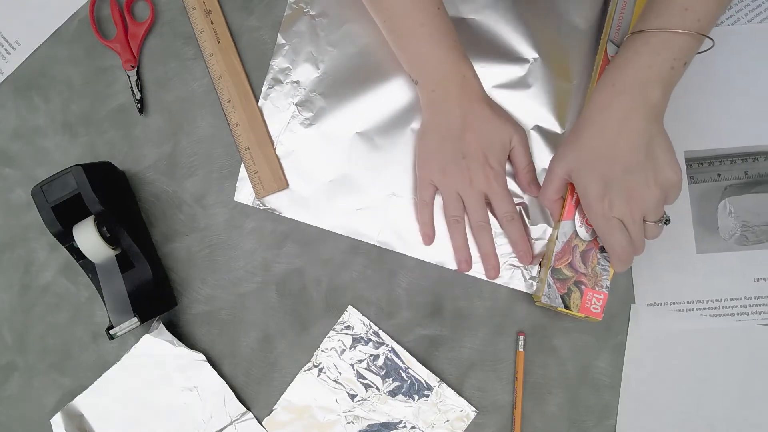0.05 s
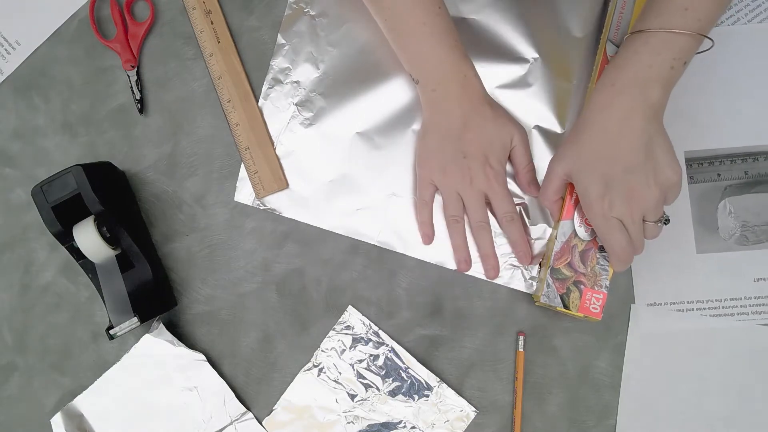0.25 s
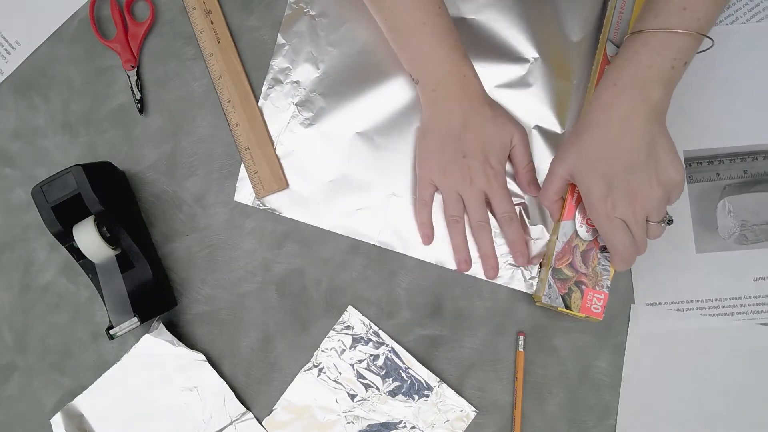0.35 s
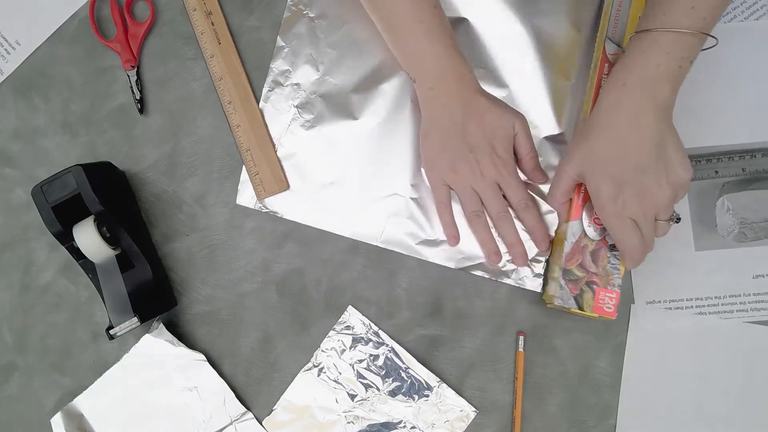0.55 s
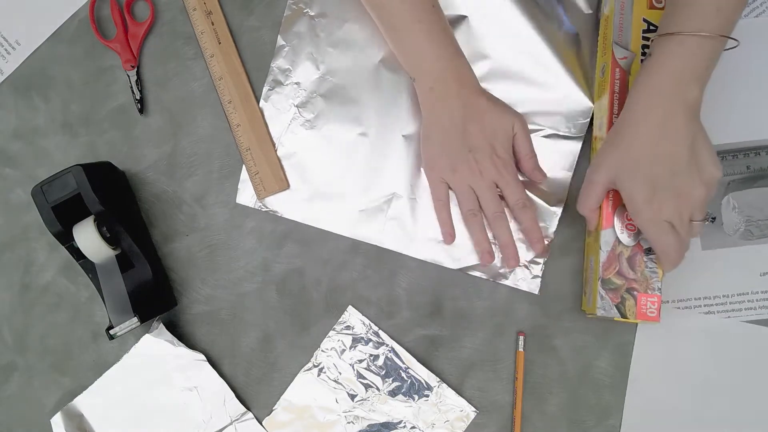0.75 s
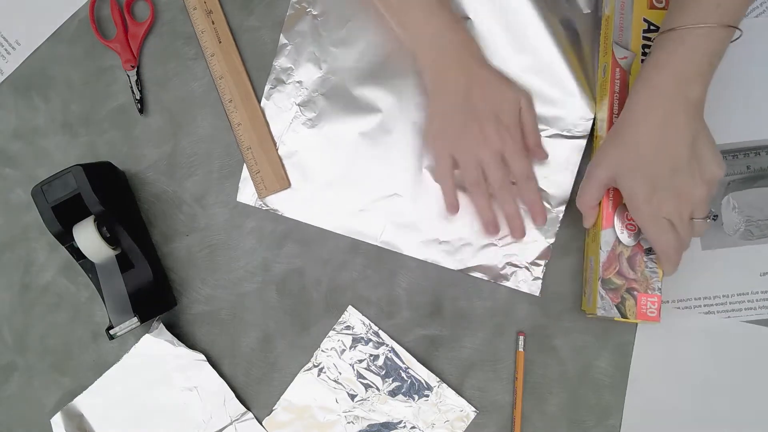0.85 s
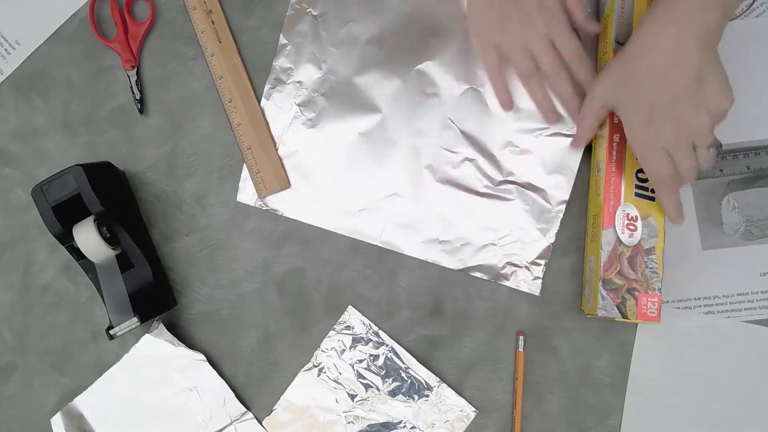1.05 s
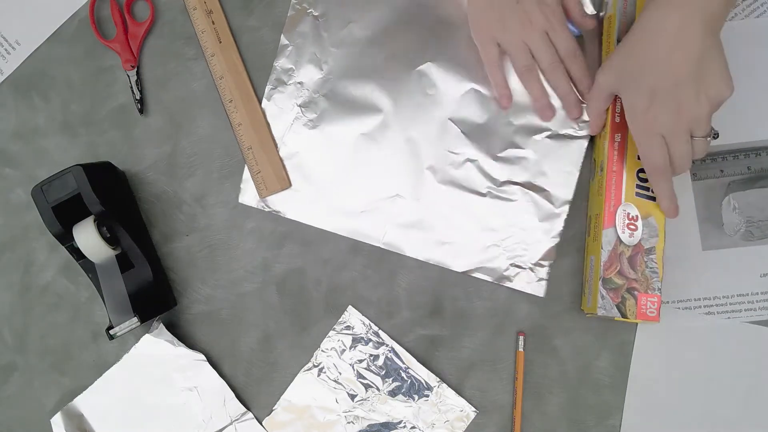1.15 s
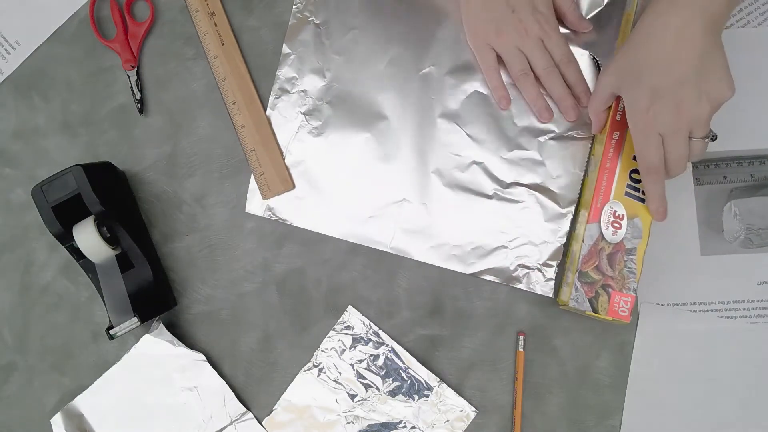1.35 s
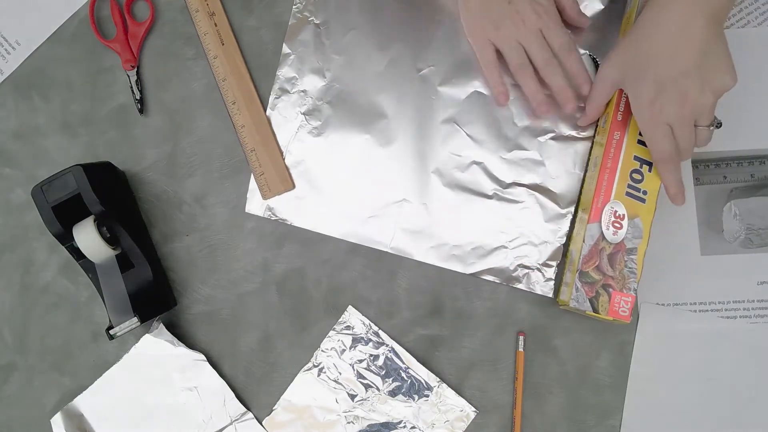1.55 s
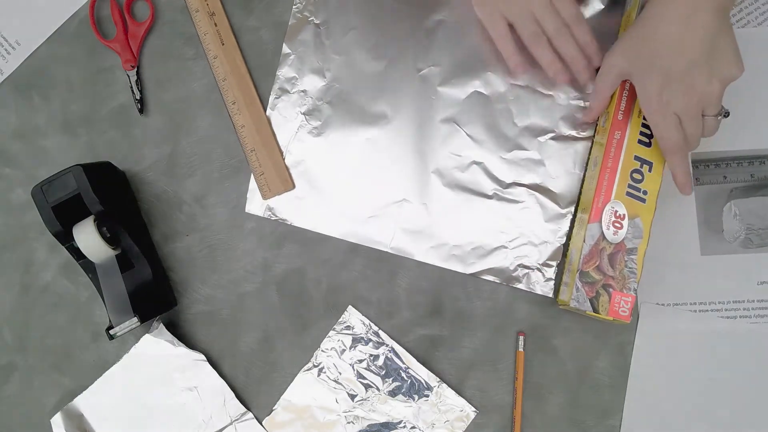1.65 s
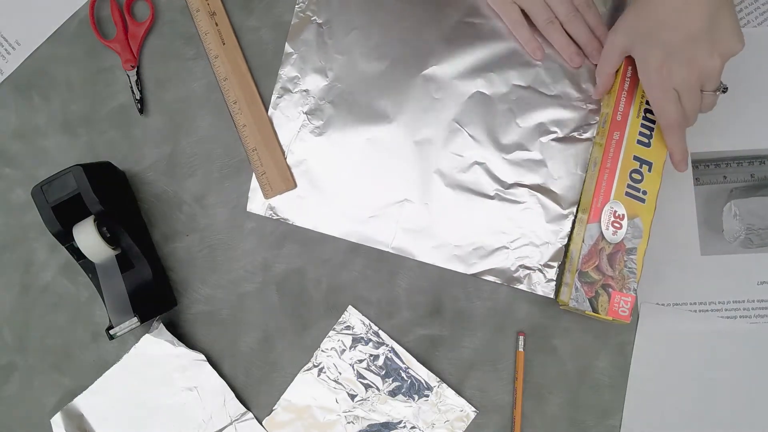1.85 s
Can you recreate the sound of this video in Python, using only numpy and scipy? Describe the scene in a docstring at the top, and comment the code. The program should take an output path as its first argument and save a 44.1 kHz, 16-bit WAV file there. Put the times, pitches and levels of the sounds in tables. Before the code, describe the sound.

In a small room, aluminium foil is torn from its box in one quick, crackling rasp. A short crumple follows, then faint crinkles and ticks, with soft knocks and scrapes of the cardboard box on the table.

```python
"""At a table in a small room, aluminium foil is torn along the toothed edge of its cardboard box.
The tear is a stream of tiny fractures, and the teeth, cutting through in turn, excite a rasp in the box.
The torn edge brushes along the box; then the sheet crumples under a hand and flexes softly.
Creases snap as they flip, the box bumps and slides, and the table rumbles under the hands."""
import sys
import numpy as np
from scipy import signal
from scipy.fft import rfft, irfft, next_fast_len
from scipy.io import wavfile
from scipy.ndimage import map_coordinates

SR = 44100
rng = np.random.default_rng(int(sys.argv[2]) if len(sys.argv) > 2 else 0)


def materialize(psi):
    """Save the field psi as 16-bit PCM at rate SR to the path in sys.argv[1].

    A 1-D psi becomes a single channel; in a 2-D psi each row is a channel.
    """
    bounded = np.clip(np.atleast_2d(psi).T, -1, 1)
    quanta = np.round(bounded * 32767).astype(np.int16)
    wavfile.write(sys.argv[1], SR, quanta)


N = 83790
T = np.arange(N) / SR
FFT_SIZE = next_fast_len(N + SR // 2)
HZ = np.fft.rfftfreq(FFT_SIZE, 1 / SR)

# Envelopes of the sustained sources: time_s, relative_level_db
RUMBLE_ENVELOPE = [(0.0, -90), (0.226, -65), (0.306, -59), (0.454, -54.5), (0.814, -67.5), (1.164, -64),
                   (1.502, -79), (1.566, -67.5), (1.9, -87)]
TEAR_ENVELOPE = [(0.08, -97), (0.086, -72), (0.098, -78), (0.12, -48), (0.136, -60), (0.146, -44.5),
                 (0.158, -52.5), (0.188, -50), (0.196, -31.5), (0.232, -28), (0.268, -34), (0.28, -27.5),
                 (0.288, -28), (0.346, -28.5), (0.398, -33), (0.41, -26), (0.468, -25.5), (0.52, -47)]
RASP_ENVELOPE = [(.27, -55.5), (.285, -47), (.302, -42), (.328, -27.5), (.386, -34.5), (.396, -46.5),
                 (.406, -34.5), (.428, -27), (.44, -39), (.47, -34), (.495, -62), (.52, -76)]
BRUSH_ENVELOPE = [(.48, -63), (.5, -56), (.52, -48.5), (.535, -41.5), (.55, -42.5), (.572, -33.5),
                  (.59, -39.5), (.61, -46), (.645, -55), (.68, -69.5), (.71, -80), (.8, -86), (.83, -72)]
SLIDE_ENVELOPE = [(.62, -80), (.655, -53.5), (.662, -46), (.675, -60), (.684, -51.5), (.695, -46),
                  (.73, -65), (.78, -77), (.81, -72), (.845, -83), (.868, -52), (.918, -57.5), (.954, -52),
                  (.974, -41.5), (1.01, -49), (1.056, -57.5), (1.08, -80), (1.11, -45.5), (1.14, -64.5),
                  (1.165, -53.5), (1.21, -80), (1.25, -69.5), (1.44, -79), (1.48, -93.5)]
CRUMPLE_ENVELOPE = [(.83, -85), (.85, -74.5), (.865, -56), (.876, -52), (.882, -44.5), (.892, -46.5),
                    (.899, -33), (.925, -38), (.94, -32), (.95, -39.5), (.968, -39.5), (.975, -33),
                    (.982, -32.5), (.991, -34), (1.0, -39.5), (1.006, -29), (1.022, -43.5), (1.04, -38),
                    (1.06, -51.5), (1.09, -70), (1.097, -56), (1.112, -56.5), (1.12, -43), (1.135, -59),
                    (1.152, -87), (1.165, -65), (1.2, -80)]
# Spectral shapes of the sources: frequency_hz, relative_gain_db
RUMBLE_SPECTRUM = [(15, -8.5), (27, -3.5), (37, 1), (55, -21), (130, -15.5), (300, -37.5)]
TEAR_SPECTRUM = [(60, -25.5), (230, -26.5), (380, -15), (600, -15.5), (900, -7), (1700, -1), (2400, -3.5),
                 (3400, -.5), (5800, -2.5), (9000, -6.5), (15500, -7.5)]
TAUT_SHEET_SPECTRUM = [(60, -14.5), (160, -16), (350, 1), (570, -12.5), (760, -1.5), (1200, -3.5),
                       (1500, -4.5), (1900, -2), (2450, -8.5), (3400, -3.5), (7000, -23), (15000, -32)]
BRUSH_SPECTRUM = [(60, -15), (350, -16), (650, -14.5), (1000, -8), (1450, -12), (1900, -5), (2300, -12),
                  (3400, 1.5), (5900, 0.5), (9000, -3.5), (15500, -12)]
SLIDE_SPECTRUM = [(80, -10), (200, -9.5), (400, -4), (560, -12.5), (750, 0), (1020, 3), (1300, -17),
                  (4000, -31.5)]
FLEX_SPECTRUM = [(200, -2.5), (800, 2.5), (1150, -5), (1600, -0.5), (2100, -2), (2550, -9), (3200, -4),
                 (6000, -1.5), (9000, -5), (15500, -8.5)]
CRUMPLE_SPECTRUM = [(60, -21.5), (300, -15.5), (550, -14), (1030, 0), (1430, -1.5), (1950, 0.5), (2400, -5),
                    (3100, 1), (6000, 0), (9000, -4), (15500, -8)]
BACKGROUND_SPECTRUM = [(20, -5), (35, 0), (140, -14), (300, -22.5), (550, -29), (740, -22), (1200, -39),
                       (4000, -41.5), (15500, -43)]
# Creases flipping: start_s, relative_peak_db, pitch_hz, decay_cycles
CREASE_SNAPS = [(.087, -55.5, 3000, 0.56), (.1155, -30, 2950, 0.62), (.121, -29, 3320, 0.67),
                (.1445, -27.5, 2320, 0.33), (0.1778, -35, 2600, 0.47), (.1928, -20.5, 4950, 0.33),
                (.202, -15.5, 4550, 0.44), (.2785, -6.5, 3160, 0.98), (.426, -11.5, 3020, 0.27),
                (.470, -21, 2500, 0.15), (.528, -23, 4470, 0.46), (.637, -32.5, 1700, 0.28),
                (.898, -22, 4600, 0.42), (.9735, -18, 6530, 1.1), (1.0052, -18, 3470, 0.32),
                (1.096, -30.5, 4560, 0.71), (1.108, -31, 1310, 0.47), (1.119, -36, 3430, 0.5),
                (1.176, -50, 4290, 13), (1.381, -56, 4245, 12), (1.541, -39.5, 1840, 2),
                (1.610, -33.5, 7500, 0.3), (1.633, -27, 7000, 0.74), (1.637, -34.5, 7300, 0.72),
                (1.6977, -55.5, 2240, 1.5), (1.7412, -62.5, 7000, 0.37)]
# Impacts of the box on the table: start_s, relative_peak_db, pitch_hz
BOX_BUMPS = [(.105, -59.5, 470), (0.277, -40.5, 270), (.585, -45.5, 410), (0.661, -50.5, 256),
             (.682, -45.5, 900), (.871, -44, 699), (1.164, -53, 800), (1.186, -65, 251),
             (1.238, -48.5, 270), (1.553, -49.5, 281.6)]
# Speed of the tear along the edge: time_s, teeth_per_s
TOOTH_RATE = [(.31, 802), (.335, 877), (.37, 1017), (.39, 1050), (.41, 920), (.43, 960), (.47, 857)]
# Soft flexes of the sheet: crest_s, relative_level_db, rise_s (per 12 dB), low_edge_hz
SHEET_FLEXES = [(.728, -39.5, 0.0051, 2835), (0.747, -53, .01, 2800), (1.177, -62.5, 0.0055, 3360),
                (1.229, -62.5, 0.0063, 1770), (1.259, -56, 0.0068, 2500), (1.309, -62, 0.006, 1720),
                (1.334, -75.5, .01, 1660), (1.382, -59.5, .004, 3100), (1.522, -67.5, 0.0067, 1370),
                (1.54, -44, 0.011, 1220), (1.581, -60, 0.018, 1575), (1.615, -53.5, 0.0057, 3700),
                (1.637, -48.5, 0.004, 5160), (1.665, -44, 0.0023, 5100), (1.741, -65.5, 0.0021, 3430),
                (1.772, -53, 0.0023, 4240), (1.79, -64, 0.026, 1152), (1.886, -37, 0.0069, 1280)]
# Normal modes of the sheet and the box: centre_hz, bandwidth_hz, relative_gain_db
SHEET_MODES = [(1940, 73, 2.5), (3190, 67, 1), (4350, 120, -2), (5700, 410, -6), (6750, 130, -3)]
BOX_MODES = [(781, 54, -2), (865, 180, 1), (1005, 42, 4.5), (1204, 34, -6), (1270, 24, -6.5)]
# Stereo width of the foil's shimmer: frequency_hz, side_gain_db
SHIMMER_WIDTH = [(200, -6.5), (1000, -10), (3000, -3), (8000, 0)]
# Reverberation time of the room: frequency_hz, t60_s
REVERB_TIME = [(150, 0.1), (500, .3), (800, 0.34), (1300, 0.2), (5000, 0.12), (15000, 0.071)]
# Strength of the reverberation: frequency_hz, gain_db
REVERB_GAIN = [(150, -4.5), (1000, -9.5), (5000, -14), (15000, -23.5)]


def amp(db):
    """Amplitude ratio for a level in decibels."""
    return 10 ** (np.asarray(db) / 20)


def unit_rms(x):
    """Normalisation to unit mean power."""
    return x / np.sqrt(np.mean(x ** 2) + 1e-20)


def log_interp(points, hz):
    """Interpolation on a logarithmic frequency axis."""
    frequencies, values = np.transpose(points)
    return np.interp(np.log(hz + 1), np.log(frequencies + 1), values)


def envelope(rows):
    """Gain per sample, linear in decibels between the rows and silent outside them."""
    return amp(np.interp(T, *np.transpose(rows), left=-120, right=-120))


def filtered(x, response):
    """Linear filtering by multiplication of spectra."""
    return irfft(rfft(x, FFT_SIZE) * response, FFT_SIZE)[..., :N]


def colour(x, spectrum):
    """Minimum-phase shaping, at unit rms: no ringing precedes its cause."""
    cepstrum = irfft(np.log(np.maximum(amp(log_interp(spectrum, HZ)), 1e-6)), FFT_SIZE)
    cepstrum[1:FFT_SIZE // 2] *= 2
    cepstrum[FFT_SIZE // 2 + 1:] = 0
    return unit_rms(filtered(x, np.exp(rfft(cepstrum))))


def resonances(modes):
    """Superposed responses of damped oscillators."""
    return sum(amp(db) * 1j * HZ * width / (hz * hz - HZ ** 2 + 1j * HZ * width)
               for hz, width, db in modes)


def noise(side_db):
    """Partially correlated white noise in two channels."""
    mid, side = rng.standard_normal((2, N))
    return np.array([mid + amp(side_db) * side, mid - amp(side_db) * side])


def radiate(mid, side):
    """Treble radiates from the sheet in all directions, so its stereo image is widest."""
    side = filtered(side, amp(log_interp(SHIMMER_WIDTH, HZ)))
    return np.array([mid + side, mid - side])


def crackle(per_s, spread_db, shimmer_db=1.5, t60_s=.014):
    """Shot noise: tiny fractures at random moments, each leaving a brief shimmer in the sheet."""
    sizes = amp(spread_db * np.minimum(rng.standard_normal(N), 2.2))
    clicks = sizes * rng.choice([-1, 1], N) * (rng.random(N) < per_s / SR)
    decay = amp(-60 * np.arange(SR // 20) / SR / t60_s) ** 2
    energy = abs(signal.fftconvolve(clicks ** 2, decay / decay.sum())[:N])
    mid, side = amp(shimmer_db) * np.sqrt(energy) * rng.standard_normal((2, N))
    return radiate(clicks + mid, side)


def bending(x, patchy_db, ring_db, patch_hz=132.8, patch_s=.07):
    """Plate resonance: the sheet has steady modes, and narrow ones that come and go as it bends."""
    hz, t, spectra = signal.stft(x, SR, nperseg=1024)
    grid = np.meshgrid(hz / patch_hz, t / patch_s, indexing="ij")
    patches = map_coordinates(rng.standard_normal((600, 200)), grid, mode="wrap")
    x = signal.istft(spectra * amp(patchy_db * patches), SR, nperseg=1024)[1][:, :N]
    return filtered(x, 1 + amp(ring_db) * resonances(SHEET_MODES))


def table_rumble():
    """Forced vibration: the hands drive the table at low frequencies."""
    return amp(-2) * envelope(RUMBLE_ENVELOPE) * colour(noise(side_db=-16.5), RUMBLE_SPECTRUM)


def tear():
    """Fracture: the foil parts along the edge of the box in many tiny steps."""
    fractures = bending(crackle(per_s=3200, spread_db=2.5), patchy_db=.5, ring_db=-13)
    return amp(.5) * envelope(TEAR_ENVELOPE) * colour(fractures, TEAR_SPECTRUM)


def crease_snaps(shimmer_db=-17, shimmer_t60_s=.03, crack_db=-15, crack_t60_s=.012):
    """Snap-through: a crease flips with a damped click, a shimmer near its pitch and a bright crack."""
    out = np.zeros((2, N + SR))
    t = np.arange(SR // 25) / SR
    f = np.fft.rfftfreq(len(t), 1 / SR)
    for start_s, db, hz, cycles in CREASE_SNAPS:
        click = np.sin(2 * np.pi * hz * t) * t * np.exp(-hz * t / cycles)
        band = f / np.hypot(f, hz / 2) / np.hypot(f, 2 * hz)
        shimmer = unit_rms(irfft(rfft(rng.standard_normal((2, len(t)))) * band))
        crack = np.diff(rng.standard_normal((2, len(t) + 1))) / 2
        mid_side = shimmer * amp(shimmer_db - 60 * t / shimmer_t60_s)
        mid_side += crack * amp(crack_db - 60 * t / crack_t60_s)
        mid_side[0] += click / abs(click).max()
        out[:, round(start_s * SR):][:, :len(t)] += amp(db - 4) * mid_side
    return radiate(*out[:, :N])


def box_bumps(attack_s=.006, t60_s=.032):
    """Impact: each dull knock on the table excites a cluster of damped modes."""
    out = np.zeros(N + SR)
    t = np.arange(SR // 5) / SR
    for start_s, db, hz in BOX_BUMPS:
        modes_hz = hz * np.exp(.3 * rng.standard_normal((8, 1)))
        ring = np.sin(2 * np.pi * (modes_hz * t + rng.random((8, 1)))).sum(0)
        knock = ring * amp(-60 * t / t60_s) * (1 - np.exp(-t / attack_s))
        out[round(start_s * SR):][:len(t)] += amp(db - .5) * knock / abs(knock).max()
    return out[:N]


def tooth_rasp(scatter_teeth=.14, spread_db=3, box_cutoff_hz=650):
    """Nearly periodic excitation: evenly spaced teeth pluck box and taut sheet into a zipping pitch."""
    teeth_passed = np.cumsum(np.interp(T, *np.transpose(TOOTH_RATE))) / SR
    timing, size = rng.standard_normal((2, 2400))
    onsets = np.searchsorted(teeth_passed, np.arange(len(timing)) + scatter_teeth * timing)
    plucks = np.bincount(onsets, amp(spread_db * size), N)[:N]
    drive = unit_rms(plucks - plucks.mean()) + amp(-10) * rng.standard_normal((2, N))
    sheet = colour(drive + unit_rms(crackle(per_s=2000, spread_db=0)), TAUT_SHEET_SPECTRUM)
    radiation = HZ ** 2 / np.hypot(HZ ** 2, box_cutoff_hz ** 2)  # a small box radiates little bass
    box = unit_rms(filtered(drive, resonances(BOX_MODES) * radiation))
    return envelope(RASP_ENVELOPE) * (amp(-2) * box + amp(-5) * sheet)


def edge_brush():
    """Friction: the torn edge comes free and brushes along the box."""
    contacts = bending(crackle(per_s=6000, spread_db=4), patchy_db=4.5, ring_db=-9.5)
    return amp(2.5) * envelope(BRUSH_ENVELOPE) * colour(contacts, BRUSH_SPECTRUM)


def box_slide():
    """Sliding friction: the box scrapes over the table in jerks."""
    return amp(-2) * envelope(SLIDE_ENVELOPE) * colour(noise(side_db=-15.5), SLIDE_SPECTRUM)


def sheet_flexes(body_db=-27, t60_s=.064):
    """Flexure: short swells of fine crinkling; a smaller patch of foil radiates less bass."""
    crinkle = bending(crackle(per_s=4500, spread_db=4.5), patchy_db=4.5, ring_db=-3.5)
    crinkle = colour(crinkle, FLEX_SPECTRUM)
    out = np.zeros((2, N))
    for crest_s, db, rise_s, edge_hz in SHEET_FLEXES:
        swell_db = np.where(T < crest_s, -12 * (crest_s - T) / rise_s, -60 * (T - crest_s) / t60_s)
        radiation = amp(body_db) + HZ ** 3 / np.hypot(HZ ** 3, edge_hz ** 3)
        out += amp(db + 4 + np.maximum(swell_db, -150)) * unit_rms(filtered(crinkle, radiation))
    return out


def crumple():
    """Buckling: the freed sheet gives way under the hand in a dense run of clicks."""
    buckles = bending(crackle(per_s=4400, spread_db=3), patchy_db=1, ring_db=-9)
    return amp(3.5) * envelope(CRUMPLE_ENVELOPE) * colour(buckles, CRUMPLE_SPECTRUM)


def reverberation(x):
    """Diffuse field: after 4 ms each channel gets its own tail, decaying exponentially in each band."""
    hz, t, spectra = signal.stft(rng.standard_normal((2, SR // 2)), SR, nperseg=256)
    decay = amp(-60 * t / log_interp(REVERB_TIME, hz)[:, None])
    energy = (decay ** 2).mean(1, keepdims=True) * SR / 2
    decay *= amp(log_interp(REVERB_GAIN, hz))[:, None] / np.sqrt(energy)
    tail = signal.istft(spectra * decay, SR, nperseg=256)[1]
    return signal.fftconvolve(x, np.pad(tail, ((0, 0), (SR // 250, 0))), axes=1)[:, :N]


def scene(left_lag_s=3.2e-5, background_db=-84.5):
    """Superposition: direct sound from near the middle, reverberation and a faint background."""
    direct = tear() + edge_brush() + crumple() + tooth_rasp() + crease_snaps() + sheet_flexes()
    direct += box_bumps() + box_slide() + table_rumble()
    lag = np.exp(np.outer([-1, 1], 1j * np.pi * HZ * left_lag_s))
    direct = filtered(direct, lag) * amp([[.3], [-.3]])
    in_room = direct + reverberation(direct)
    return in_room + amp(background_db) * colour(noise(side_db=-5.5), BACKGROUND_SPECTRUM)


def record(dry, top_hz=16200, taper_hz=500):
    """Band limiting: a raised-cosine taper passes nothing above top_hz."""
    return filtered(dry, np.sin(np.pi / 2 * np.clip((top_hz - HZ) / taper_hz, 0, 1)) ** 2)


dry = scene()
out = record(dry)
materialize(out)
```